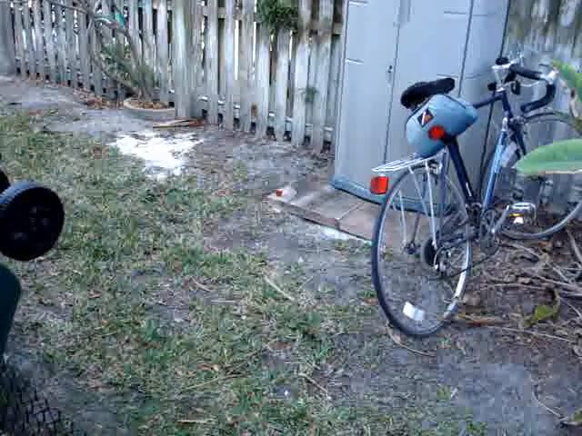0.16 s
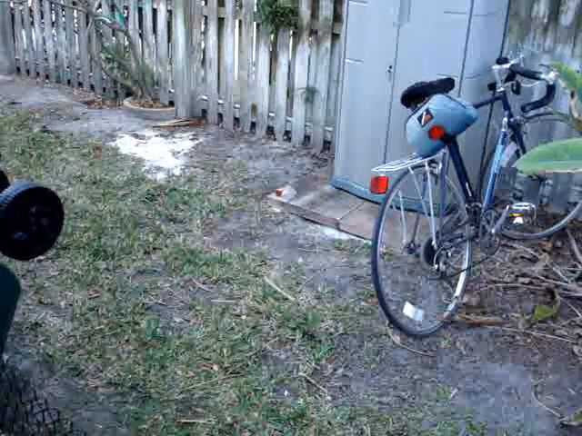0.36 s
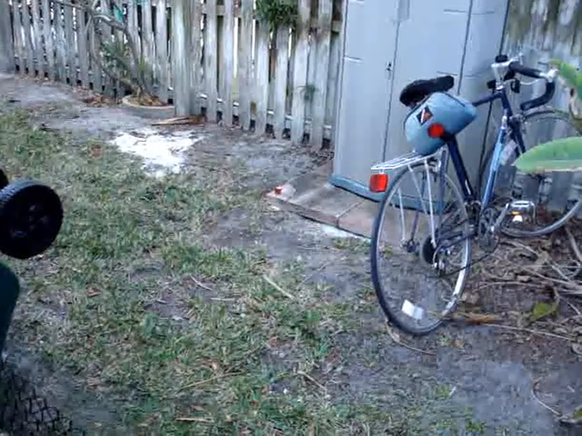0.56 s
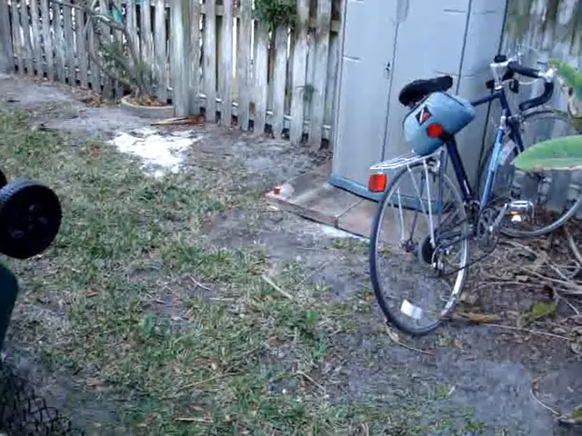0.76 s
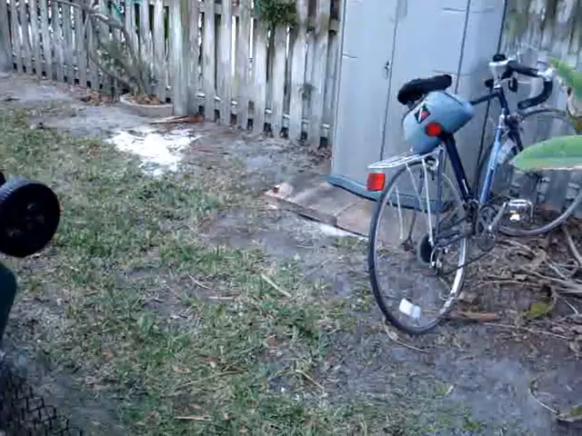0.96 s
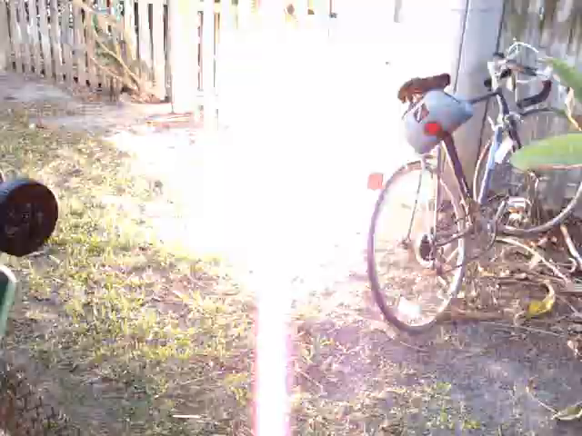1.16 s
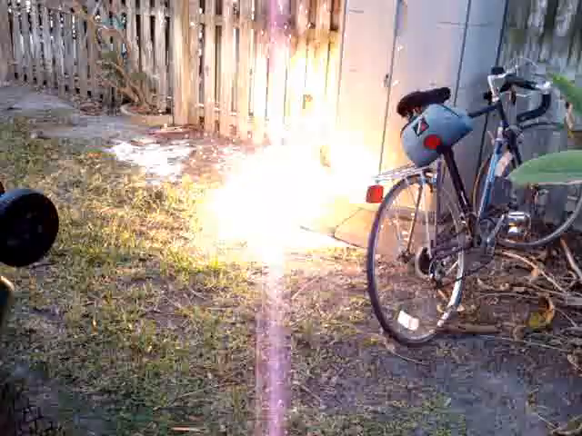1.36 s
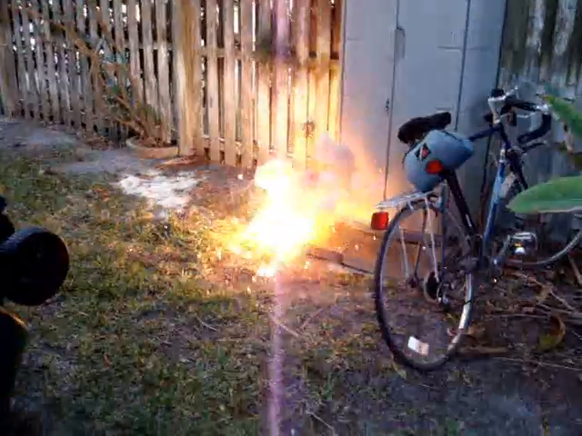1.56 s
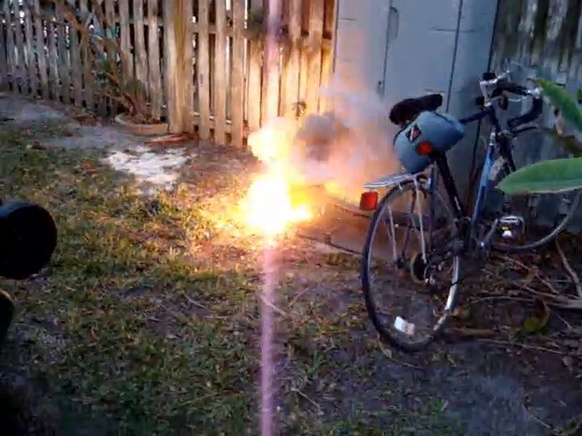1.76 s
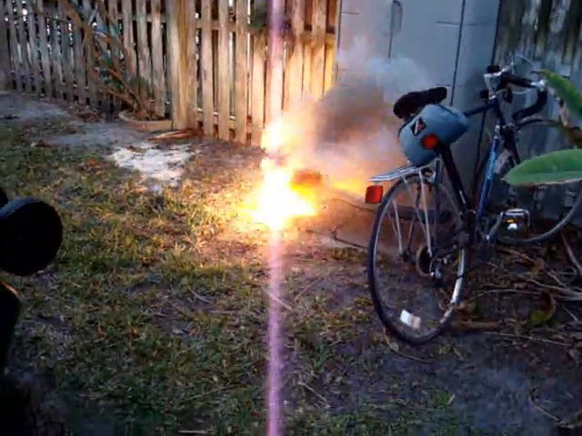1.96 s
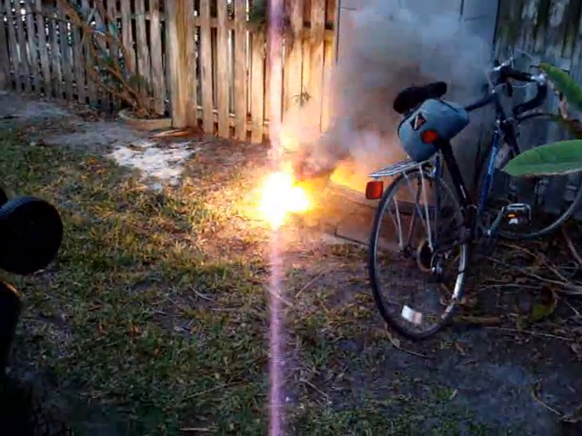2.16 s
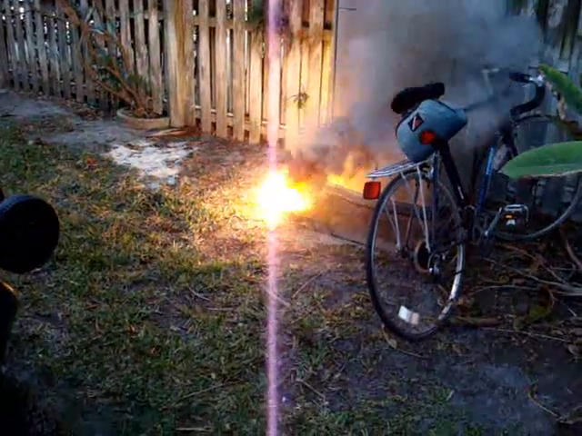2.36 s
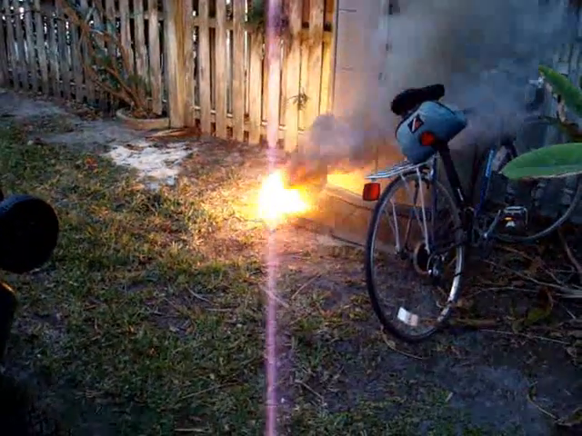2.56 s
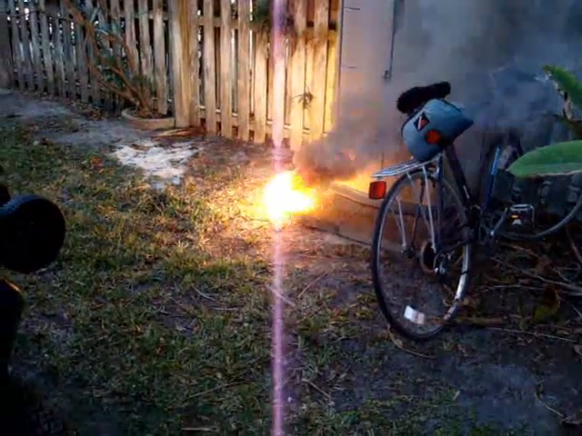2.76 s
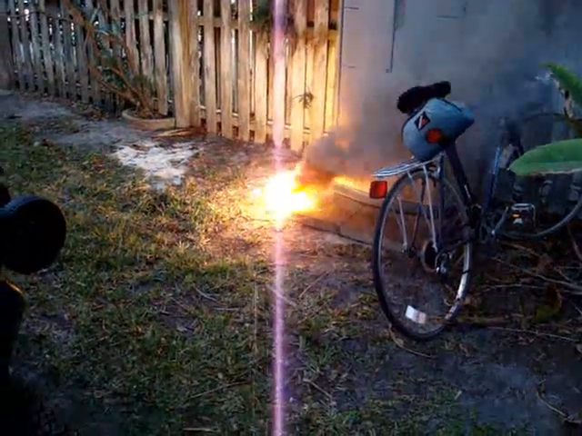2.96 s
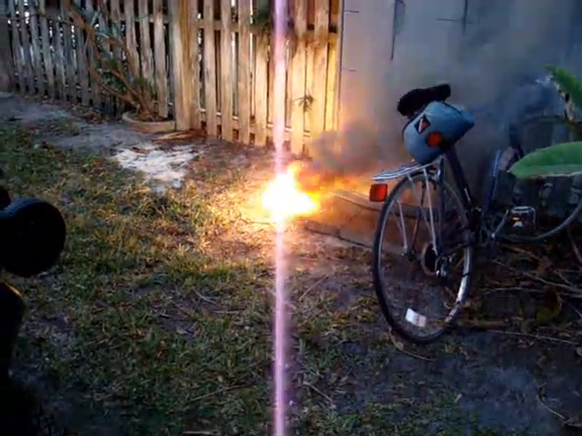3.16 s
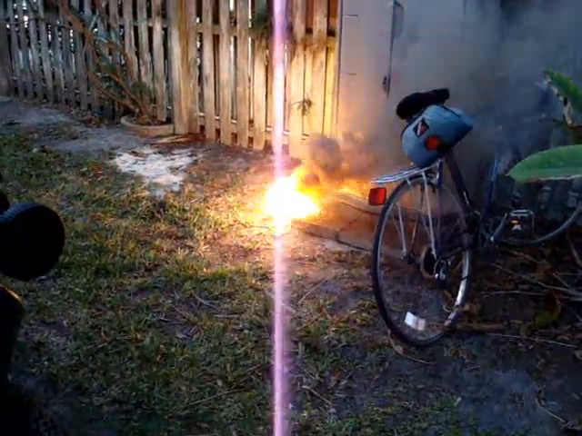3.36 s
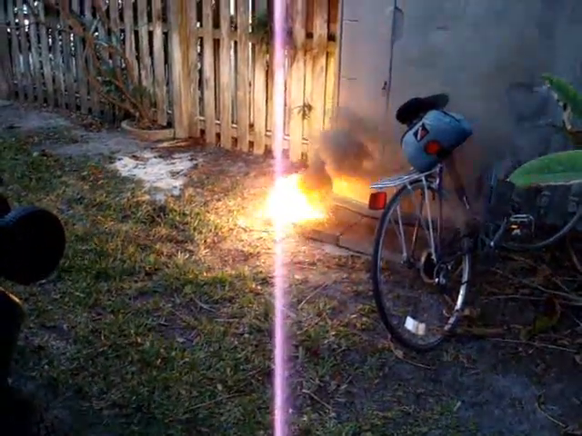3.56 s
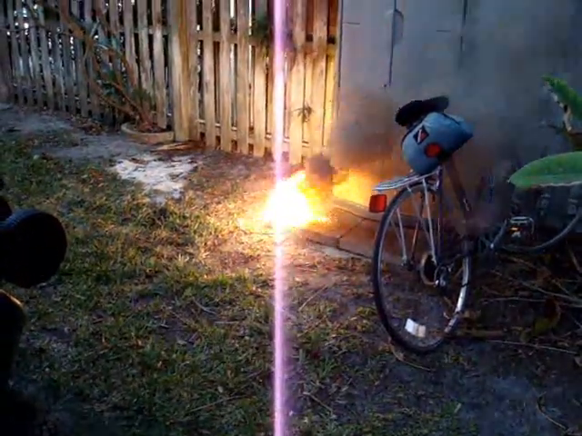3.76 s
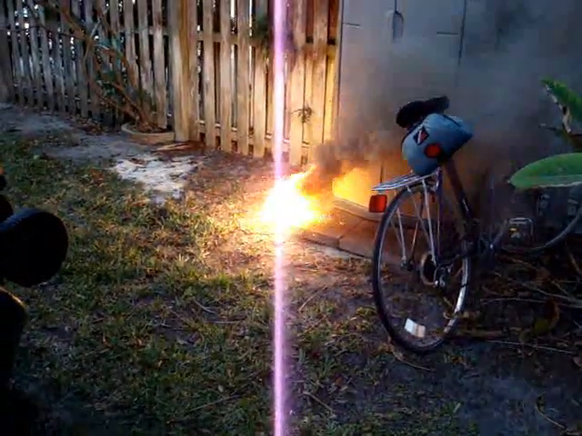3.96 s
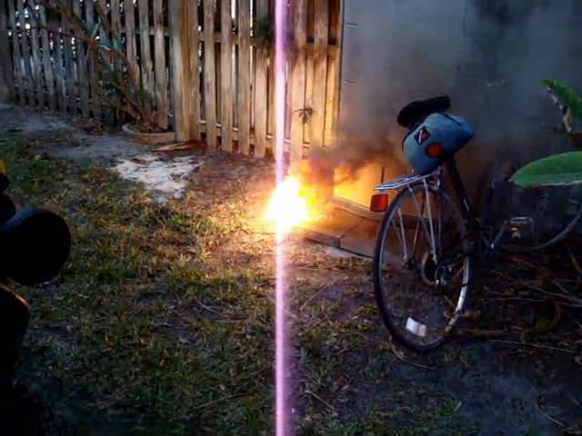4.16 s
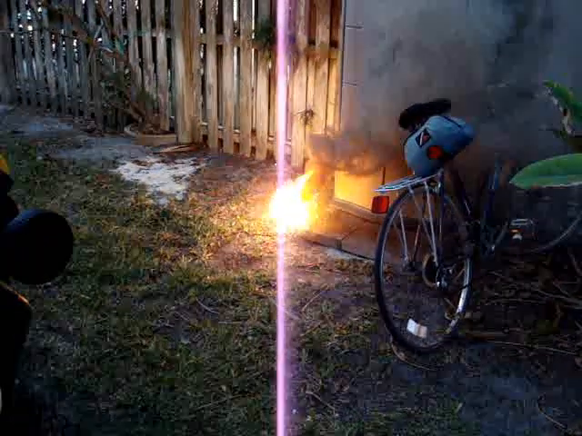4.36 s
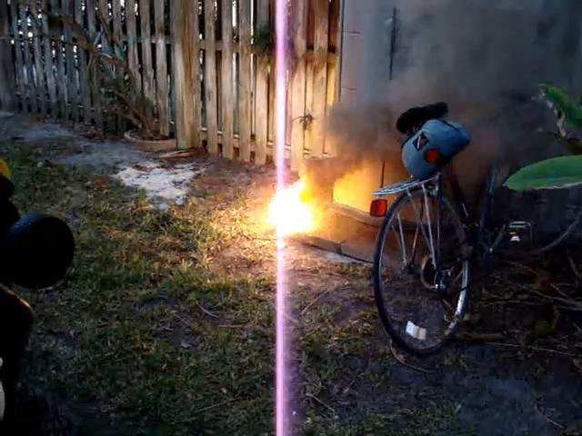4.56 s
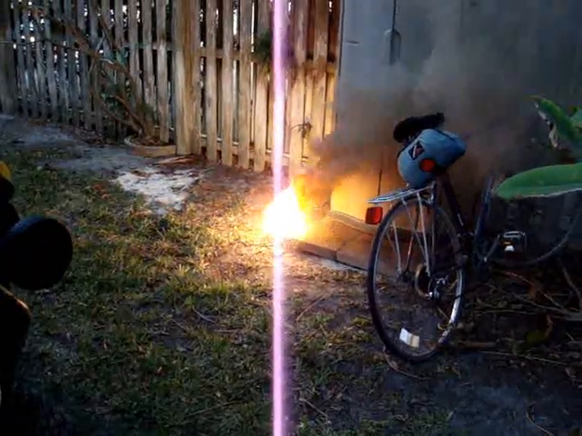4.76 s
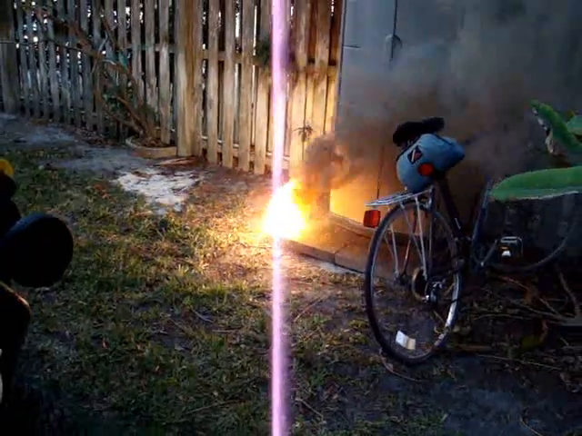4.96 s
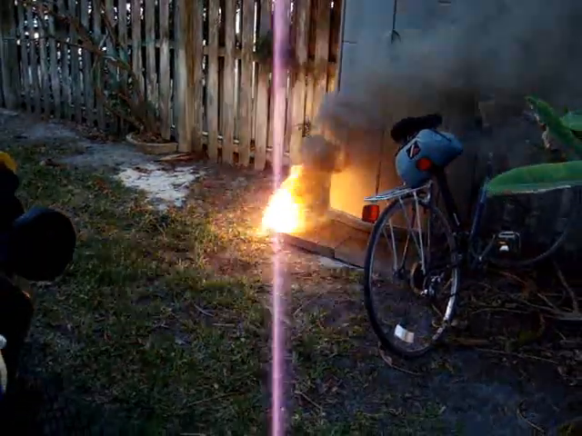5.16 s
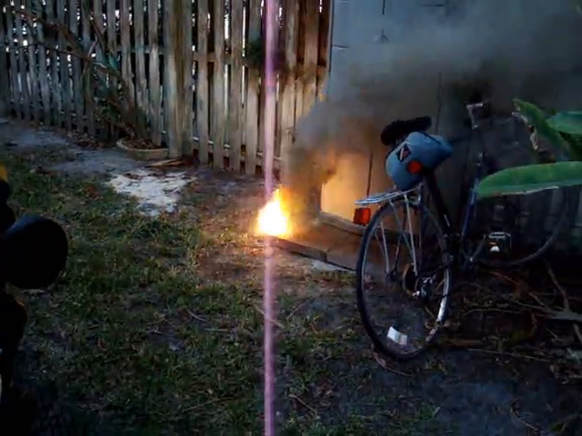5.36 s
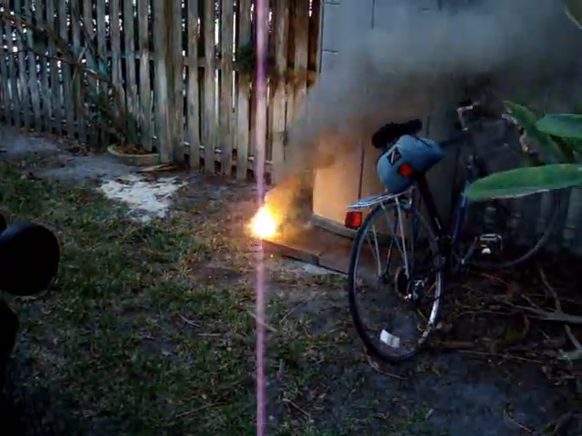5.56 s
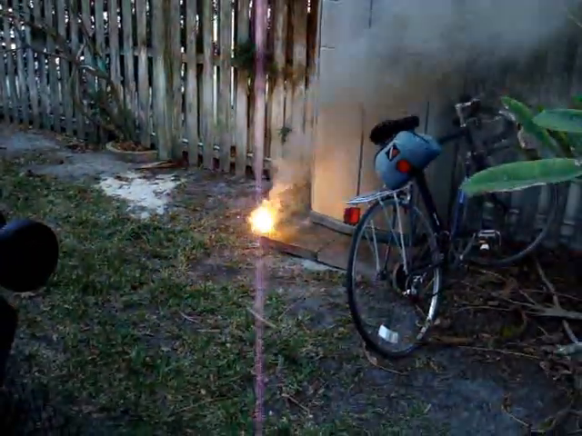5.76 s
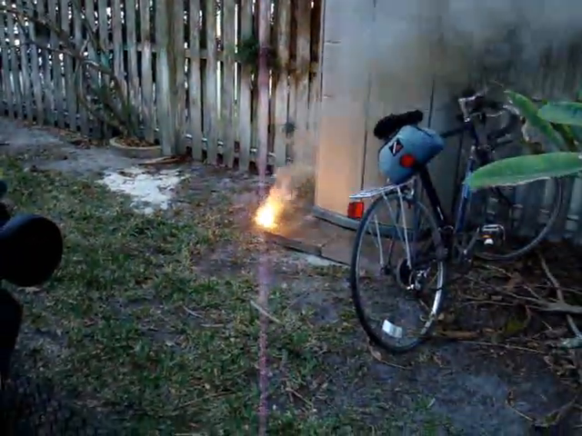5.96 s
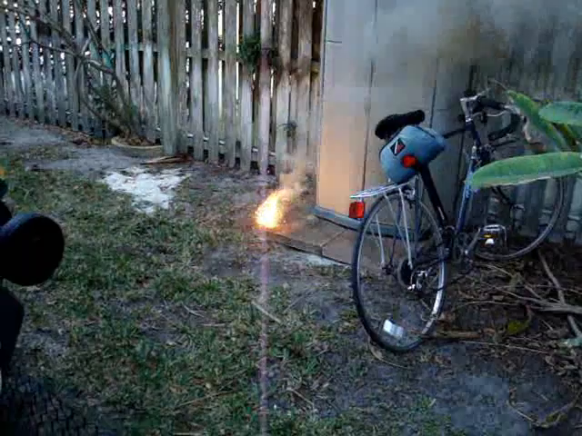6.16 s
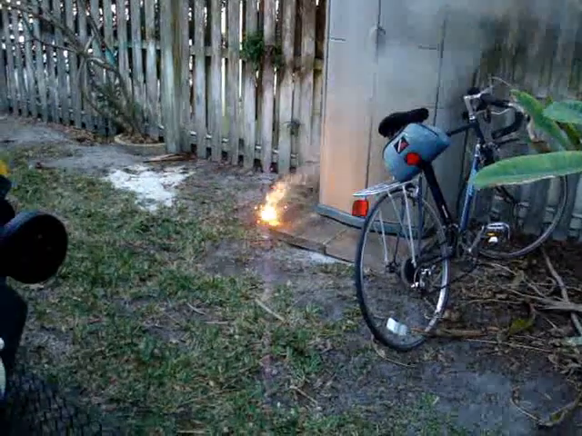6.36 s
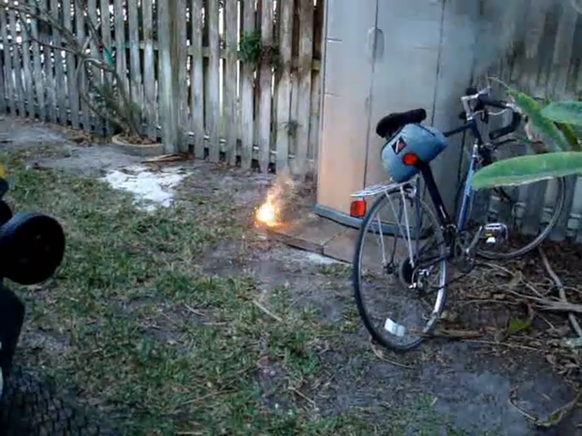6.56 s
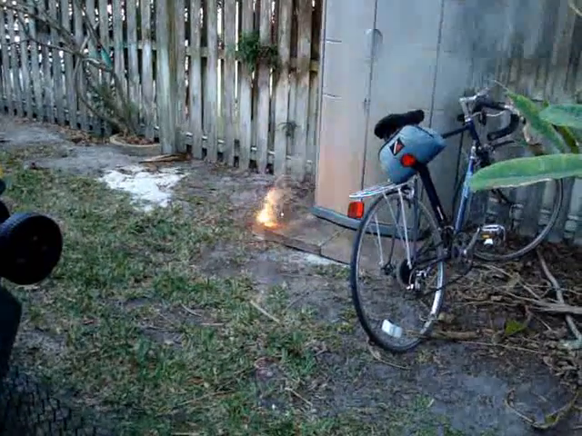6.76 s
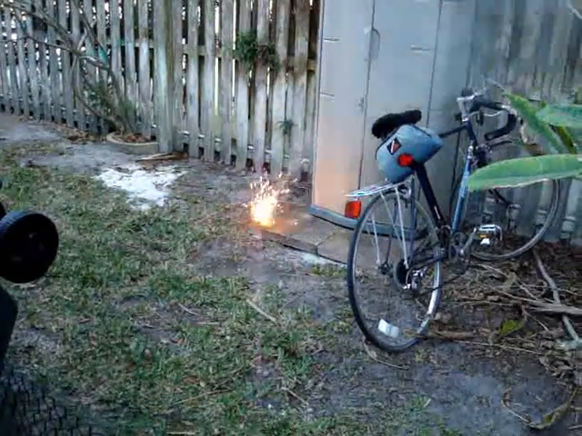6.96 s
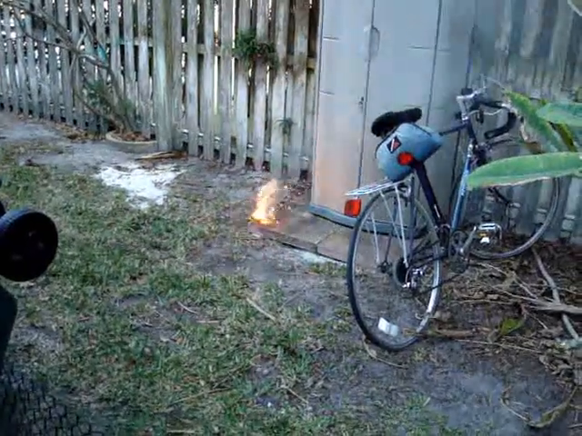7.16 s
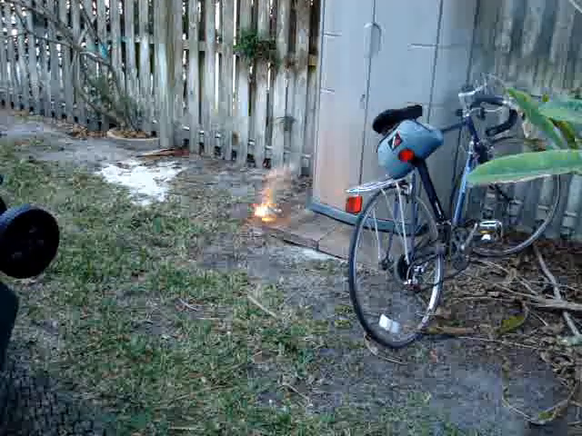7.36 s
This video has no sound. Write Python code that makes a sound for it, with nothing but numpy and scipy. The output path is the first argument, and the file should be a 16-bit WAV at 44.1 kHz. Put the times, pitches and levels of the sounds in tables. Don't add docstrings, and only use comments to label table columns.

```python
import sys
import numpy as np
from scipy import signal
from scipy.fft import rfft, irfft, next_fast_len
from scipy.io import wavfile

SR = 44100
rng = np.random.default_rng(int(sys.argv[2]) if len(sys.argv) > 2 else 0)


def unload_audio(sound):
    columns = np.transpose(np.atleast_2d(sound))
    steps = np.round(np.clip(columns, -1, 1) * 32767)
    wavfile.write(sys.argv[1], SR, steps.astype(np.int16))


def amplitude_ratio(level_db):
    exponent = np.asarray(level_db, float) / 20
    return 10 ** exponent


N = 326781
T = np.arange(N) / SR
SIZE = next_fast_len(N)
HZ = np.maximum(np.arange(SIZE // 2 + 1) * SR / SIZE, 1)
JET_TOP_HZ = 15900


def rms_one(x):
    return x / np.sqrt(np.mean(x ** 2) + 1e-20)


def in_time(rows, silent_db=-90):
    s, *columns = np.transpose(rows)
    out = [np.interp(T, s, c) for c in columns]
    out[0] = np.where((T >= s[0]) & (T <= s[-1]), out[0], silent_db)
    return out


def at_hz(points, hz):
    point_hz, value = np.transpose(points)
    return np.interp(np.log(hz), np.log(point_hz), value)


def filtered(x, gain):
    return irfft(rfft(x, SIZE) * gain, SIZE)[:N]


def drift(rate):
    r = np.exp(-80 * np.pi * rate / SR)
    noise = rng.standard_normal(N // 40 + 2002)
    slow = signal.lfilter([1], [1, -2 * r, r * r], noise)[2000:]
    return np.interp(np.arange(N) / 40, np.arange(len(slow)), rms_one(slow))


def bumps(rows, half_s):
    shape = np.array([-half_s, -half_s / 2, half_s / 2, half_s])
    return sum(np.interp(T, s + shape, [0, db, db, 0]) for s, db in rows)


def surroundings(peaks, echoes, contrast=1.12):
    humps_db = sum(db / (1 + (2 * (HZ - hz) / width) ** 2) for hz, width, db in peaks)
    paths = 1 + sum(gain * np.exp(-2j * np.pi * HZ * ms / 1000) for ms, gain in echoes)
    return amplitude_ratio(contrast * humps_db) * paths


# time in seconds, hiss in dB, gas pressure from -1 to 1.
BURN = [(1.45, -35, -0.72), (1.5, -30, -0.75), (1.6, -28, -0.52), (1.66, -30.5, -0.43),
        (1.9, -30.5, -0.099), (2.07, -28.5, -0.36), (3.0, -27, 0.097), (3.2, -28.5, 0.072), (3.55, -27, .6),
        (3.85, -25.5, 1), (4.3, -25.5, 0.66), (5.0, -24.5, 0.3), (5.25, -23, 0.19), (5.42, -27, .6),
        (5.52, -24.5, -0.074), (5.56, -27.5, -.2), (5.83, -27.5, -0.52), (6.08, -39, -0.88)]
# start in seconds, rise in seconds, hold in seconds, hiss in dB, fade in dB/s.
PUFFS = [(1.353, .006, .01, -31.5, 150), (1.397, .005, 0.0041, -27.5, 160), (5.573, .12, 0.043, -25.5, 400),
         (5.836, .007, 0.016, -27.5, 77), (5.946, .012, 0.062, -26.5, 164),
         (6.079, 0.091, .025, -26.5, 128), (6.25, 0.016, 0.016, -27.5, 130),
         (6.327, 0.0087, 0.045, -25, 134), (6.489, 0.029, 0.037, -26.5, 196), (6.638, .018, .02, -26, 215),
         (6.734, 0.053, 0.028, -27, 228), (7.136, .002, 0.022, -21, 220), (7.21, .006, .03, -27.5, 300),
         (7.236, 0.02, 0.052, -22, 196), (7.367, 0.038, .05, -29, 200)]


def outflow():
    smoulder_db, puff_pressure = -56, -0.58
    burn_db, pressure = in_time(BURN)
    power = amplitude_ratio(2 * burn_db) + amplitude_ratio(2 * smoulder_db) * (T > PUFFS[0][0])
    for s, rise, hold, db, fade in PUFFS:
        attack = np.clip((T - s) / rise, 0, 1)
        decay_db = fade * np.maximum(T - s - rise - hold, 0)
        power += (attack * amplitude_ratio(db - decay_db)) ** 2
    return 10 * np.log10(power), np.where(T > BURN[-1][0], puff_pressure, pressure)


def gas_and_sparks(flutter_db, spark_db):
    clicks = (rng.random(N) < 1500 / SR) * amplitude_ratio(4.7 * np.minimum(rng.exponential(1, N), 4))
    sparks = clicks * rng.choice([-1, 1], N)
    turbulence = rng.standard_normal(N) * amplitude_ratio(flutter_db * drift(81))
    return turbulence + amplitude_ratio(spark_db) * rms_one(sparks)


# centre in Hz, width in Hz, level in dB.
FIRST_PEAKS = [(770, 75, 4), (1370, 150, 3), (1840, 130, 8), (2720, 53, 5), (2970, 190, 4), (4140, 60, 5),
               (4370, 50, 5), (5050, 120, 5), (5950, 75, 4), (7500, 60, 4)]
EARLY_PEAKS = [(570, 30, 4), (750, 210, 10), (880, 60, -6), (970, 40, 6), (1110, 90, 7), (1230, 50, 7),
               (1420, 70, 7), (1480, 60, -6), (1560, 70, 6), (1830, 50, 5), (1980, 40, 8), (2160, 60, 8),
               (2270, 40, -3), (2380, 30, -2), (2810, 360, 7), (3210, 100, -3), (3480, 270, 3),
               (4460, 90, 5), (4730, 100, -3), (5020, 110, 6), (5660, 130, 3), (6830, 90, 2),
               (7540, 360, 3)]
MIDDLE_PEAKS = [(570, 20, 2), (750, 220, 10), (870, 60, -6), (950, 90, 6), (1090, 110, 8), (1240, 60, 6),
                (1420, 60, 5), (1490, 60, -5), (1580, 130, 10), (1980, 60, 10), (2160, 120, 5),
                (2270, 40, -4), (2390, 40, -5), (2760, 270, 8), (3150, 70, -7), (3420, 90, 2),
                (4070, 140, -4), (4520, 130, 2), (4760, 60, -6), (5050, 260, 5), (5700, 360, 4),
                (6740, 90, 2), (7670, 120, 2)]
LATE_PEAKS = [(590, 140, 4), (790, 40, -5), (1010, 80, 7), (1110, 90, -5), (1380, 60, -11), (1420, 110, 8),
              (1590, 80, 8), (1750, 180, -5), (2060, 100, 5), (2300, 140, -7), (2670, 450, 7),
              (3010, 80, -5), (3290, 360, 6), (3550, 80, -3), (3970, 60, -4), (4660, 150, 4),
              (4900, 60, -5), (5220, 250, 4), (5780, 190, 3)]
# delay in ms, gain.
EARLY_ECHOES = [(5.3, 0.012), (6.8, 0.013), (9.3, 0.049), (16.0, 0.16), (23.0, 0.24), (31.3, 0.1)]
LATE_ECHOES = [(5.3, 0.036), (7.3, 0.12), (10.1, 0.13), (15.9, 0.082), (24.1, 0.14), (33.1, 0.21)]
# time in seconds, stage from 0 to 3.
SLUMP = [
    (1.65, 0.01),
    (2.0, 1),
    (3.2, 0.99),
    (3.6, 1.34),
    (4.6, 2.26),
    (5.05, 2.98),
]


def through_melt(gas):
    stage = np.interp(T, *np.transpose(SLUMP))
    settings = [(FIRST_PEAKS, EARLY_ECHOES), (EARLY_PEAKS, EARLY_ECHOES),
                (MIDDLE_PEAKS, EARLY_ECHOES), (LATE_PEAKS, LATE_ECHOES)]
    heard = 0
    for k, (peaks, echoes) in enumerate(settings):
        share = np.maximum(1 - abs(stage - k), 0)
        heard = heard + share * rms_one(filtered(gas, surroundings(peaks, echoes)))
    return heard


# delay in ms, wander in ms, gain.
SMOKE_PATHS = [(4.4, .12, .18), (7.9, .2, .18)]


def through_smoke(x):
    out = x
    for ms, wander, gain in SMOKE_PATHS:
        delay_s = (ms + wander * drift(.6)) / 1000
        out = out + gain * np.interp(T - delay_s, T, x)
    return out


# time in seconds, level in dB.
FLARES = [
    (2.0, 2),
    (2.95, 2),
    (3.4, 1),
]
# time in seconds, level in dB.
CHOKES = [
    (1.455, -5),
    (3.2, 1),
    (6.09, -5),
    (6.486, -18),
    (6.632, -14),
    (6.735, -3),
    (6.91, -1),
]


def nozzle_db(centre_hz, spent):
    change_db = 0
    if 6900 < centre_hz < 13000:
        change_db = change_db + bumps(FLARES, half_s=.1)
    if 5100 < centre_hz < 7100:
        ragged_db = 12 * (.4 + 0.86 * spent) * np.maximum(drift(50) - 1.1, 0)
        change_db = change_db + bumps(CHOKES, half_s=.012) - ragged_db
    return change_db


# frequency in Hz, level in dB per Hz.
JET_COLOUR = [(250, -30), (400, -22), (600, -14), (1000, -12.5), (2000, -7), (3200, -3), (5000, -1.5),
              (7000, -3.5), (9800, -9), (10100, -19), (12500, -19.5), (15500, -14.5), (15900, -22)]


def jet(flutter_db, patchy_db, spark_db):
    hiss_db, pressure = outflow()
    spent = np.interp(T, (5.38, 5.7), [0, 1])
    # dB, dB per unit of pressure, dB once spent
    roar, whistle = (-10.5, -1.9, 0.092), (0.1, 4.5, 0.1)
    sizzle, air = (-2.68, 0.1, -6), (-14, 2.3, -1.6)
    wanted_db = [db + per_unit * pressure + late_db * spent
                 for db, per_unit, late_db in (roar, (0, 0, 0), whistle, sizzle, air)]
    heard = through_smoke(through_melt(gas_and_sparks(flutter_db, spark_db)))
    spectrum = rfft(heard, SIZE) * amplitude_ratio(at_hz(JET_COLOUR, HZ)) * (HZ < JET_TOP_HZ)

    edges_hz = [400, 1500, 4000, 6500, 10000, 15900]
    raw_db = []
    for low, high in zip(edges_hz, edges_hz[1:]):
        energy = np.sum(abs(spectrum[(HZ > low) & (HZ < high)]) ** 2)
        raw_db.append(10 * np.log10(2 * energy / SIZE / N))

    centres_hz = [400, 700, 1200, 1800, 2500, 3500, 4400, 5200, 6000, 7000, 8200, 9800, 10200, 12500, 15800]
    out, shared = 0, drift(21)
    for k, centre in enumerate(centres_hz):
        mask = np.interp(np.log(HZ), np.log(centres_hz), np.arange(len(centres_hz)) == k)
        region = np.searchsorted(edges_hz[1:], centre)
        flicker_db = patchy_db * (.5 * shared + drift(9.4) + 0.28 * drift(25))
        level_db = hiss_db + wanted_db[region] - raw_db[region] + flicker_db + nozzle_db(centre, spent)
        out = out + amplitude_ratio(level_db) * irfft(spectrum * mask, SIZE)[:N]
    return out


def front(ms):
    u = np.arange(round(4 * ms * SR / 1000)) * 1000 / SR / ms
    dip = -np.minimum(u / .2, 1) * np.exp(-np.maximum(u - .2, 0) * 1.8) * (u < .62)
    push = (u >= .62) * np.minimum((u - .62) * 12, 1) * np.exp(-(u - .7) * 3)
    return dip + push


# time in seconds, peak in dB, length in ms.
FRONTS = [
    (1.3535, -1, .9),
    (1.3551, -7, .6),
    (1.3600, -9, 1.1),
    (1.3774, -5, .8),
    (1.3940, -1, 1.0),
    (1.3947, -6, .5),
    (1.3961, -8, .6),
    (1.4115, -8, 1.0),
    (7.1392, -10, .8),
    (7.141, -9, .6),
]
# time in seconds, level in dB, ring in Hz.
FLASH = [(1.354, -14.5, 1000), (1.378, -12.5, 1100), (1.392, -21, 1100), (1.398, -15.5, 790),
         (1.410, -22, 720), (1.422, -17, 895), (1.428, -29, 900), (1.446, -24, 900), (1.450, -40, 900)]


def bursts():
    out = np.zeros(N)
    for s, db, ms in FRONTS:
        pulse, at = front(ms), round(s * SR)
        out[at:at + len(pulse)] += amplitude_ratio(db) * pulse
    flash_db, ring_hz = in_time(FLASH)
    born = (rng.random(N) < 3000 / SR) * amplitude_ratio(2.5 * rng.standard_normal(N))
    swarm = signal.fftconvolve(born, front(0.65))[:N]
    ring = 0
    for hz in np.geomspace(400, 2400, 8):
        near = np.exp(-(np.log(hz / ring_hz) / 0.78) ** 2)
        resonance = 1 / (1 + 2.5j * (HZ / hz - hz / HZ))
        ring = ring + near * rms_one(filtered(swarm, resonance))
    return out + amplitude_ratio(flash_db - 9) * ring


# time in seconds, peak in dB.
SPITS = [
    (5.8448, -12),
    (6.439, -20),
    (6.46, -17),
    (6.5844, -17),
    (6.6464, -15),
    (6.859, -20),
    (6.875, -17.5),
    (7.21, -13),
    (7.356, -13),
]


def spits():
    t60_s, dull_hz = 0.024, 5000
    clicks = np.zeros(N)
    for s, db in SPITS:
        clicks[round(s * SR)] = amplitude_ratio(db - 8)
    fade = amplitude_ratio(-60 / (t60_s * SR))
    colour = surroundings(LATE_PEAKS, LATE_ECHOES) * amplitude_ratio(at_hz(JET_COLOUR, HZ)) / (1 + (HZ / dull_hz) ** 2)
    noise = rms_one(filtered(rng.standard_normal(N), colour * (HZ < JET_TOP_HZ)))
    return signal.lfilter([1], [1, -fade], clicks + 1e-18) * noise


# time in seconds, level in dB.
RUMBLE = [(1.55, -52), (1.66, -64), (1.85, -57), (1.95, -49), (2.42, -43.5), (2.62, -48), (5.4, -49.5),
          (5.75, -57), (7.41, -64)]
# frequency in Hz, level in dB per Hz.
RUMBLE_COLOUR = [(15, -8), (30, -6), (80, -7.5), (200, -4.5), (400, -6), (700, -24)]
# time in seconds, level in dB, t60 in seconds.
THUMPS = [
    (1.352, -27.5, 0.28),
    (1.39, -27, 0.11),
    (7.138, -35, 0.1),
]


def rumble():
    noise = rms_one(filtered(rng.standard_normal(N), amplitude_ratio(at_hz(RUMBLE_COLOUR, HZ))))
    push = sum((T > s) * amplitude_ratio(db - 60 * np.maximum(T - s, 0) / t60) for s, db, t60 in THUMPS)
    return (amplitude_ratio(in_time(RUMBLE)[0] + 1.7 * drift(7)) + push) * noise


# frequency in Hz, level in dB per Hz.
YARD = [(18, -59), (30, -23), (86, -19), (111, -9.5), (300, -7), (485, -7), (800, -7.5), (1300, -10),
        (2000, -14), (3000, -15.5), (4500, -23), (9500, -31.5), (12200, -41), (15900, -32)]
# frequency in Hz, peak level in dB.
HUM = [(118.4, -55.5), (209.9, -56), (290.7, -50.5), (360.7, -51.5), (479.1, -63), (823.6, -54.5)]
# time in seconds, frequency in Hz, level in dB, t60 in seconds.
TICK = [(.554, 2280, -40, .06), (.556, 2750, -46, .05), (.560, 1800, -41, .07), (.556, 2530, -48, .05),
        (.455, 2800, -48, .05), (.686, 1250, -45, .06), (.32, 2320, -47, .07), (.86, 1780, -46, .07),
        (.92, 2780, -47, .08), (.75, 2620, -48, .06)]
# time in seconds, gain in dB.
GAIN = [
    (1.35, 0),
    (1.36, 11.5),
    (1.7, -9.5),
    (5.5, -11.5),
    (6.5, -6.5),
    (7.0, -2.5),
    (7.41, -4),
]


def yard():
    wash_db = -41
    wash = rms_one(filtered(rng.standard_normal(N), amplitude_ratio(at_hz(YARD, HZ))))
    out = amplitude_ratio(wash_db) * amplitude_ratio(.5 * drift(12)) * wash
    for hz, db in HUM:
        out += amplitude_ratio(db + 1.9 * drift(3.9)) * np.sin(2 * np.pi * hz * T + 1.05 * drift(2.9))
    for s, hz, db, t60 in TICK:
        age = np.maximum(T - s, 0)
        attack = np.minimum(age / .004, 1)
        out += amplitude_ratio(db + 6 - 60 * age / t60) * attack * np.sin(2 * np.pi * hz * age)
    return out * amplitude_ratio(np.interp(T, *np.transpose(GAIN)))


def scene():
    mic_low_hz = 45.2
    image_db, image_hz = -23, 16100
    bang = filtered(bursts(), 1 / (1 + mic_low_hz / (1j * HZ)) ** 2)
    image = amplitude_ratio(image_db) * bang * np.cos(2 * np.pi * image_hz * T)
    fire = jet(flutter_db=0.5, patchy_db=0.84, spark_db=-9.5) + bang + image + spits() + rumble()
    mono = fire + yard()
    return np.array([mono, mono])


# start in seconds, end in seconds, change in dB.
DROPOUTS = [
    (1.338, 1.348, -24),
    (6.478, 6.48, 2),
    (6.634, 6.645, 2),
    (7.132, 7.139, -11),
]


def dropouts(x):
    drop_db = sum(db * np.interp(T, [a - .002, a, b, b + 0.002], [0, 1, 1, 0]) for a, b, db in DROPOUTS)
    return x * amplitude_ratio(drop_db)


def low_pass(x):
    return signal.sosfilt(signal.butter(12, 17090, fs=SR, output="sos"), x)


def record(dry):
    cutoff_hz = 15750
    limited = np.clip(dropouts(dry[0]), -.99, .99)
    cut = filtered(limited, np.where(HZ < cutoff_hz, 1, amplitude_ratio(-45)))
    return low_pass(np.array([cut, cut]))


dry = scene()
out = record(dry)
unload_audio(out)
```